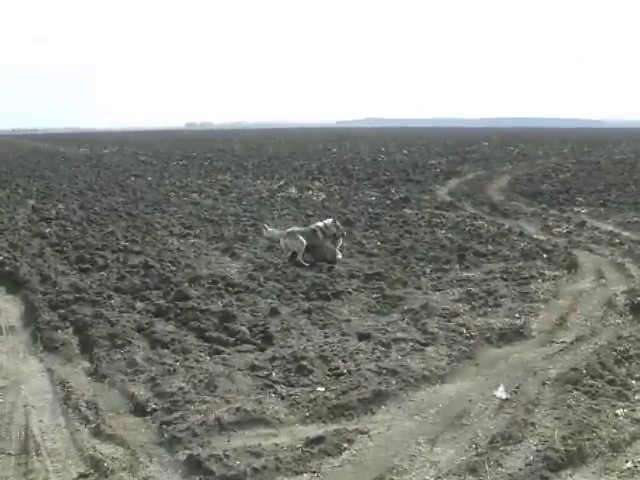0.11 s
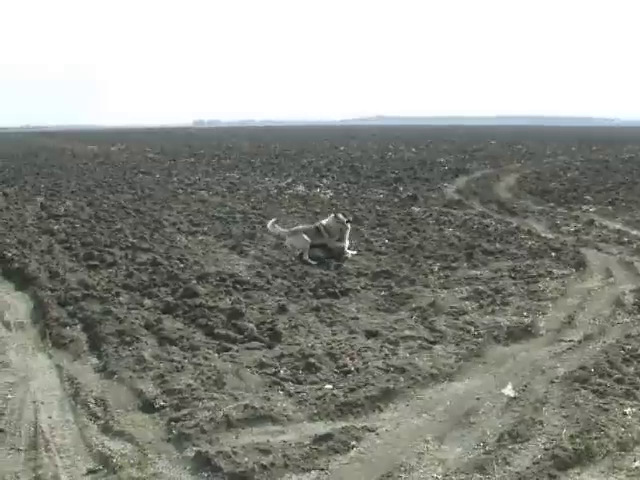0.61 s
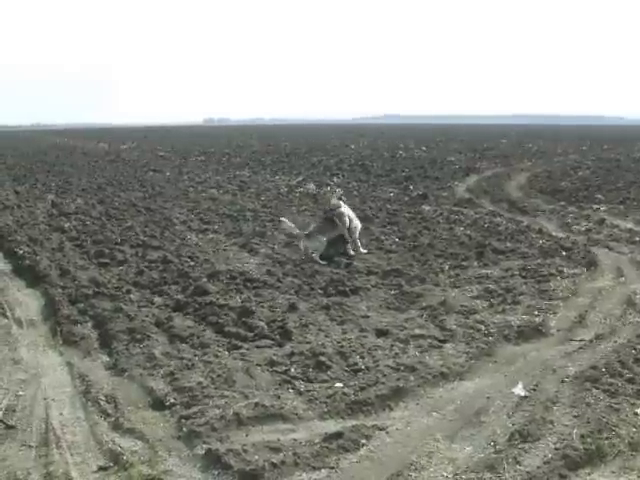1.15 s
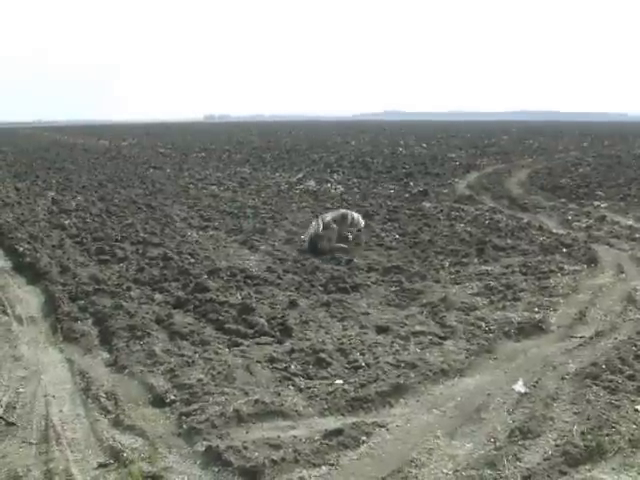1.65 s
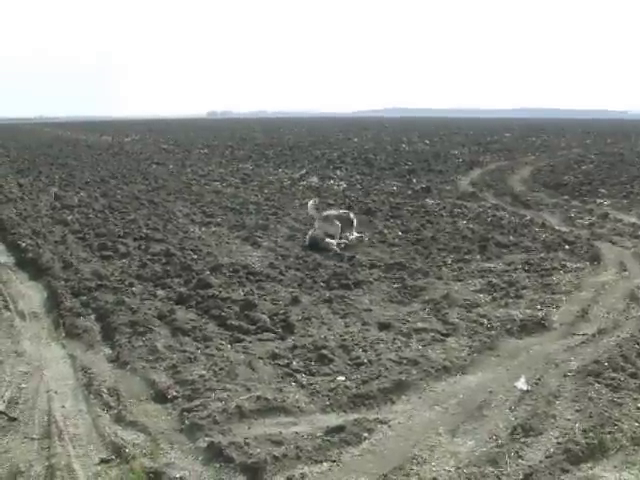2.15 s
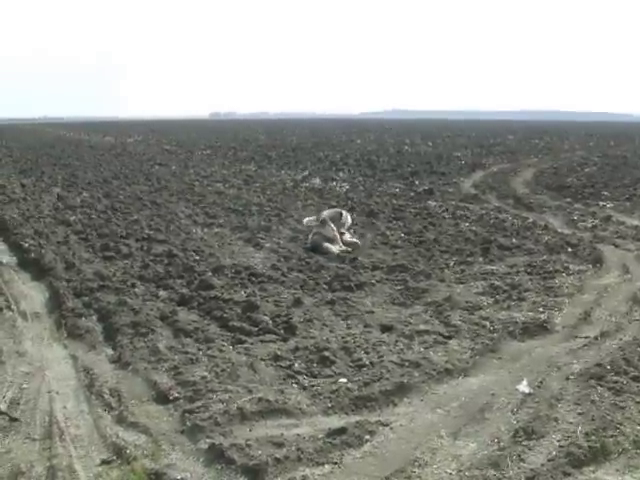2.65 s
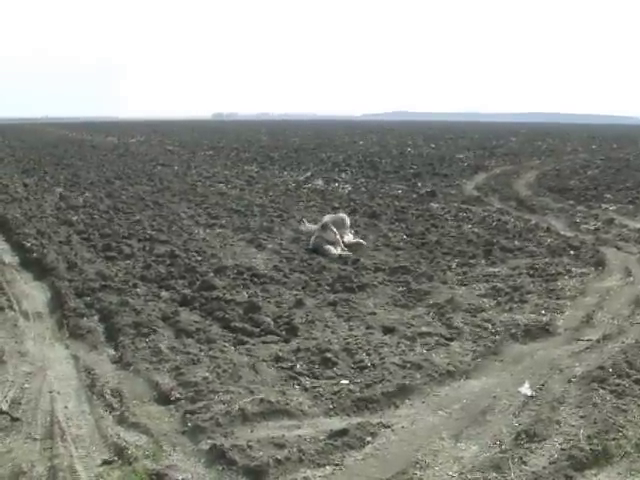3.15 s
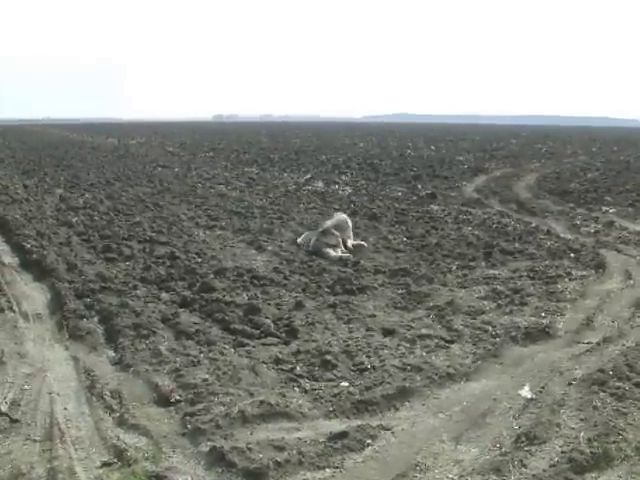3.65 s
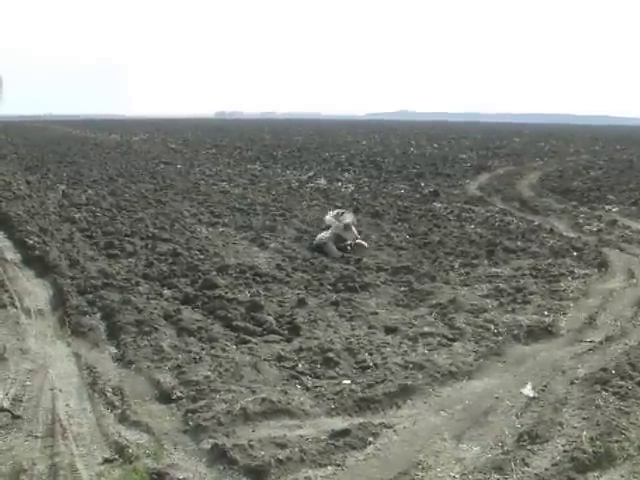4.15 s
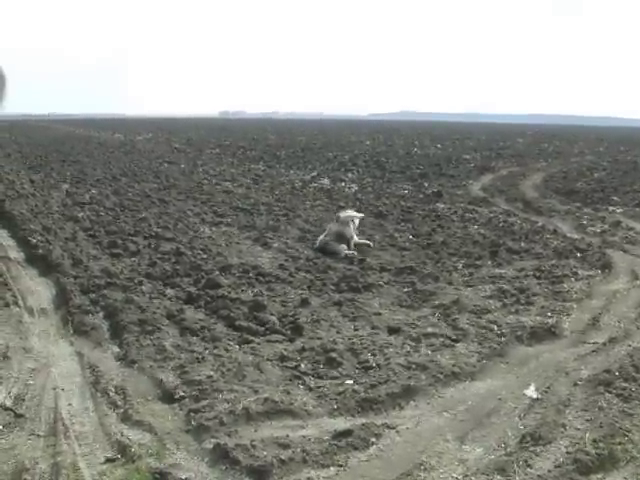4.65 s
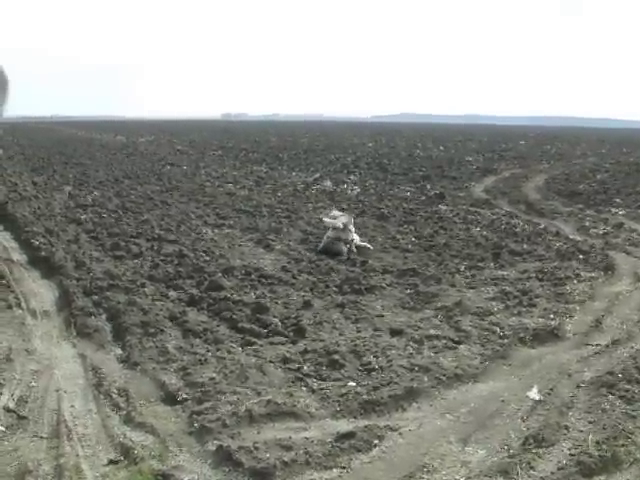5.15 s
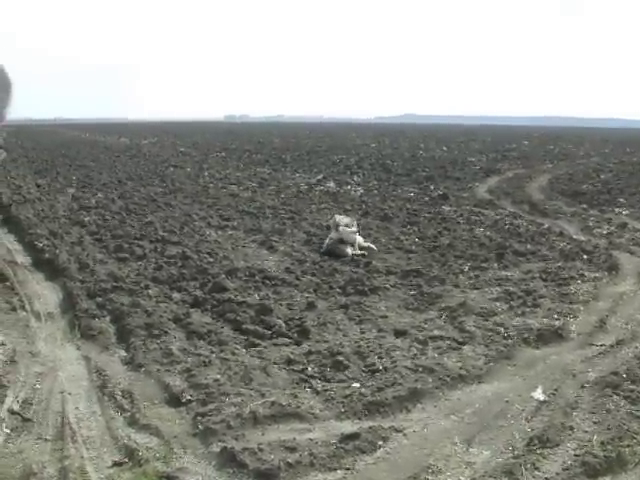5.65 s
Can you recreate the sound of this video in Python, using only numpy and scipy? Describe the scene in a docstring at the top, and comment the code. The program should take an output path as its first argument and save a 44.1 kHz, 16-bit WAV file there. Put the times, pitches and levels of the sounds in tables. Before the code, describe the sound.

Outdoor dog tussle, dry and open, caught by a cheap camera with coarse, gritty background noise. A huff and clicks, then a harsh wet snarl swells and drops, with deep fluttering growls below. A second short snarl carries one sharp tooth click; rattles thin out and a brief snarl follows. The later half is much quieter: breathy huffs, small low growls, a short snarl and a slowing throat rattle over faint hum and breeze.

```python
"""Open ploughed ground, where two dogs wrestle some way off. One snarls, huffs and rattles in its throat:
irregular fold pulses, breath and single slaps ring moving resonances. The other growls deep, with slow
pulses that are strong and weak in turn; teeth or a tag tick now and then as short bright modes.
The soil returns an early echo, and hum and breeze lie behind. A small camera samples it coarsely,
so the quiet field air flips between two converter steps."""
import sys
import numpy as np
from scipy import signal
from scipy.fft import rfft, irfft
from scipy.io import wavfile
from scipy.ndimage import uniform_filter1d

SR = 44100
rng = np.random.default_rng(int(sys.argv[2]) if len(sys.argv) > 2 else 0)


def rack_gain(trim_db):
    """Turn a fader trim in dB into the linear factor to multiply a signal by."""
    fader = np.asarray(trim_db, float)
    return 10 ** (fader / 20)


def generate_wav(sig):
    """Save sig (samples, or channels by samples) to the path in sys.argv[1] as 16-bit PCM at SR."""
    pcm = np.round(np.clip(np.atleast_2d(sig).T, -1, 1) * 32767).astype(np.int16)
    wavfile.write(sys.argv[1], SR, pcm)


N = 255339


def evened(x):
    """Normalisation: scales a signal to rms 1."""
    return x / np.sqrt(np.mean(x ** 2) + 1e-20)


def add(mix, s, sound):
    """Superposition: adds a sound to the mix from time s."""
    part = mix[round(s * SR):][:len(sound)]
    part += sound[:len(part)]


def resonate(x, hz, width_hz):
    """Moving resonance by heterodyning: shifts the curve hz down to zero, smooths, and shifts back."""
    turn = np.exp(2j * np.pi * np.cumsum(hz * np.ones(len(x))) / SR)
    r = np.exp(-np.pi * width_hz / SR)
    return 2 * (turn * signal.lfilter([1 - r], [1, -r], x / turn)).real


def pulses(hz, jitter, spread_db, alternate_db):
    """Fold vibration: one closing per cycle, uneven in time and size; returns clicks and a decaying gate."""
    wobble = evened(uniform_filter1d(rng.standard_normal(len(hz)), 300))
    turns = np.cumsum(hz * np.exp(jitter * wobble)) / SR
    cycle = turns.astype(int)
    random_db = spread_db * rng.standard_normal(len(hz))[cycle]
    size = rack_gain(random_db + alternate_db * (cycle % 2))
    clicks = -size * np.diff(cycle, prepend=0)
    gate = size * np.exp(-(turns % 1) / .3)
    return clicks, gate


def long_snarls(dogs):
    """Time-varying source and filter: effort and jaw follow a curve while the rasp slides with the lips."""
    # Effort and throat shape, one curve a snarl:
    # t/s, effort/dB, first resonance f/Hz, second resonance f/Hz, lift of second and third/dB
    curves = [
        [(0.78, -51, 1020, 2270, 0), (0.846, -29, 987, 2195, -2), (0.922, -29.5, 939, 2114, 0),
         (0.956, -21, 944, 2040, -1), (0.998, -22, 920, 2150, -7.5), (1.036, -13, 845, 2570, -0.5),
         (1.064, -25.5, 830, 1996, -1), (1.13, -31, 850, 1805, 2), (1.168, -34.5, 843, 1770, -4.5),
         (1.192, -28.5, 822, 1800, -6.5), (1.27, -50, 846, 2000, 6)],
        [(1.275, -54, 927, 2340, 3), (1.315, -35.5, 940, 2290, -1), (1.369, -33, 808, 1716, -3.5),
         (1.399, -41.5, 800, 1870, 4), (1.427, -39, 840, 1800, -3), (1.46, -63, 856, 1880, -2)],
        [(1.85, -57.5, 776, 2200, -12), (1.918, -33, 887, 2280, -10), (1.954, -34, 753, 1960, -10.5),
         (1.97, -42, 750, 1760, 11), (2.0, -41, 777, 1784, 0), (2.07, -54.5, 884, 1940, -4)],
        [(4.78, -56, 940, 2160, 3), (4.835, -46.5, 937, 2000, 1), (4.875, -46.5, 977, 2080, -6.5),
         (4.925, -44.5, 1060, 2000, -12), (4.95, -62, 1030, 2000, -10)],
    ]
    # Balance of each snarl: second/dB re first, third/dB re first, rasp/dB re first (all at usual effort),
    # rasp f/Hz at the start, rasp f/Hz at the end
    colours = [(-11, -19.5, -15.5, 4450, 5900), (-4.5, -11, -6.5, 5300, 3800), (-5, -17.5, -7, 5300, 5200),
               (-3.5, -13.5, -16, 5000, 5600)]
    # Fold drive of each snarl: pulse rate f/Hz before jitter, breath share [0-1]
    folds = [(220, .23), (220, .7), (170, .45), (180, .6)]
    for curve, colour, (rate_hz, breath) in zip(curves, colours, folds):
        s, *columns = np.transpose(curve)
        t = np.arange(s[0], s[-1], 1 / SR)
        effort_db, first_hz, second_hz, lift_db = [np.interp(t, s, column) for column in columns]
        second_db, third_db, rasp_db, start_hz, end_hz = colour
        rasp_hz = np.linspace(start_hz, end_hz, len(t))
        voice = snarl(effort_db, first_hz, second_hz, rasp_hz,
                      second_db + lift_db, third_db + lift_db, rasp_db, rate_hz, breath)
        add(dogs, s[0], voice)


def huffs(dogs):
    """Short breath bursts: one rise and fall of effort with the jaws held still."""
    # Huffs: start t/s, rise t/s, fall t/s, top effort/dB, first resonance f/Hz,
    # second/dB re first, rasp/dB re first (both at usual effort)
    huff_rows = [(0.325, 0.016, 0.078, -35.5, 1039, -13, -9), (0.46, .035, 0.027, -48, 920, -10, -14),
                 (1.499, .025, 0.19, -48, 777, -11.5, -5), (2.08, .085, .05, -44, 909, -18, -7),
                 (2.95, .1, 0.06, -56.5, 890, -6.5, -5.5), (3.66, .05, .1, -54, 997, -9.5, -11),
                 (3.919, .09, 0.055, -51.5, 958, -14, -15), (4.09, 0.074, 0.028, -53, 1012, -6.5, -15),
                 (4.999, .04, 0.15, -48, 1060, -9, -10.5)]
    # Fold drive of all huffs: pulse rate f/Hz before jitter, breath share [0-1]
    huff_folds = (130, .75)
    second_hz, rasp_hz = 2000, 5290
    third_re_second_db = -8.5
    start_db, end_db = -13, -13.5  # re top effort
    for s, rise, fall, db, first_hz, second_db, rasp_db in huff_rows:
        t = np.arange(0, rise + fall, 1 / SR)
        effort_db = db + np.interp(t, [0, rise, rise + fall], [start_db, 0, end_db])
        third_db = second_db + third_re_second_db
        voice = snarl(effort_db, first_hz, second_hz, rasp_hz, second_db, third_db, rasp_db, *huff_folds)
        add(dogs, s, voice)


def snarl(effort_db, first_hz, second_hz, rasp_hz, second_db, third_db, rasp_db, rate_hz, breath):
    """Source and filter: irregular fold pulses and puffs of breath ring a throat that moves with the jaws."""
    push_db = effort_db + 43  # re the usual effort of -43 dB
    second_lag, chest_lag, rasp_lag = .22, .3, .4  # dB that each falls behind the first per dB of push
    chest_db = -12.5  # re first, at usual effort
    clicks, gate = pulses(rate_hz + 0 * effort_db, jitter=.45, spread_db=2.8, alternate_db=0)
    puffs = (.36 + gate) * rng.standard_normal(len(gate))
    drive = (1 - breath) * evened(clicks) + breath * evened(puffs)

    first = lowest(drive, first_hz, 130)
    second = resonate(resonate(resonate(drive, second_hz, 450), second_hz, 950), second_hz, 1300)
    third = resonate(resonate(drive, 2688, 450), 2688, 900)
    chest = resonate(resonate(drive, 390, 110), 390, 250)
    rasp = bright(drive + 1.5 * evened(puffs), rasp_hz)

    # second and third have opposite polarity and share one lag
    middle = rack_gain(third_db) * evened(third) - rack_gain(second_db) * evened(second)
    voice = evened(first) + rack_gain(-second_lag * push_db) * middle
    voice += rack_gain(chest_db - chest_lag * push_db) * evened(chest)
    voice += rack_gain(rasp_db - rasp_lag * push_db) * evened(rasp)
    return rack_gain(effort_db) * voice * signal.windows.tukey(len(voice), .08)


def lowest(drive, hz, width_hz):
    """Coupled cavities: the first resonance with its nasal neighbour."""
    # Nasal side resonance: f/Hz, width of its narrower stage/Hz, gain/dB
    nose = (1220, 140, -7)
    nose_hz, nose_width_hz, nose_db = nose
    nasal = resonate(resonate(drive, nose_hz, nose_width_hz), nose_hz, 500)
    return resonate(resonate(drive, hz, width_hz), hz, 600) + rack_gain(nose_db) * nasal


def bright(drive, rasp_hz):
    """Front-cavity resonance: a moving rasp, two fixed modes and a thin flat hiss past the teeth."""
    # Fixed bright resonances: f/Hz, width of the narrower stage/Hz, gain/dB re moving rasp
    upper_modes = [(3800, 500, -4), (7600, 1000, -3)]
    rasp = resonate(resonate(drive, rasp_hz, 870), rasp_hz, 1800)
    fixed = sum(rack_gain(db) * resonate(resonate(drive, f, w), f, 2 * w) for f, w, db in upper_modes)
    flat = signal.sosfilt(signal.butter(2, 3000, "high", fs=SR, output="sos"), drive)
    return rasp + fixed + .16 * flat


def rattle_slaps():
    """Lists the impulses: single slaps, then six of a slow distant rattle that slows and fades."""
    # Slaps of the throat that stand out: t/s, peak of first resonance/dB, first resonance f/Hz,
    # upper resonances/dB re first
    rattle = [(0.335, -41, 1100, -1.5), (0.794, -31, 996, -17), (0.807, -32, 1010, -20),
              (0.819, -23.5, 1066, -6.5), (0.841, -14.5, 1064, -11.5), (0.855, -19, 930, -24),
              (0.863, -17.5, 920, -7), (0.868, -22, 854, -15), (0.883, -25, 896, -1),
              (0.903, -17, 888, -10.5), (0.93, -20.5, 975, -6.5), (0.969, -17.5, 900, -8.5),
              (1.009, -21, 720, -13), (1.026, -16, 858, -5), (1.038, -13.5, 850, -33),
              (1.111, -17, 890, -18), (1.153, -22.5, 766, -24), (1.265, -31.5, 880, -12.5),
              (1.281, -32.5, 880, -5), (1.318, -18, 1045, -10.5), (1.355, -26, 760, -1.5),
              (1.524, -26, 803, -11), (1.55, -27.5, 780, -31), (1.573, -30.5, 704, -6.5),
              (1.6, -27.5, 1120, -35), (1.641, -31, 863, -15), (1.675, -36.5, 970, -9),
              (1.706, -35.5, 955, -11), (1.896, -30.5, 790, -11), (1.924, -20, 1056, -21),
              (1.939, -25, 670, -20), (2.161, -30.5, 920, -35), (4.067, -33.5, 1010, -8.5),
              (4.152, -33.5, 1070, -10), (4.183, -33, 1004, -10), (4.832, -30.5, 990, -13.5)]
    puff_ms, far_puff_ms = 2.8, 4.2
    near = [(*row, puff_ms) for row in rattle]
    # the square term makes each gap longer
    far = [(5.024 + .0275 * k + .0023 * k * k, -33.5 - .3 * k, 1060, -17, far_puff_ms) for k in range(6)]
    return near + far


def slap(db, hz, upper_db, ms):
    """Impulse response: a click and a puff with decay constant ms ring the throat resonances."""
    t = np.arange(1800) / SR
    puff = .09 * rng.standard_normal(len(t)) * np.exp(-1000 * t / ms)
    drive = puff - (t == 0)
    first = lowest(drive, hz, 190)
    second = resonate(resonate(resonate(drive, 2280, 510), 2280, 900), 2280, 1200)
    rasp = resonate(resonate(drive, 4700, 890), 4700, 1700)
    first, second, rasp = [x / abs(x).max() for x in (first, second, rasp)]
    return rack_gain(db) * (first - rack_gain(upper_db) * (second + .33 * rasp))


def pinch(dogs, slaps):
    """Flow obstruction: the throat pinches shut for a few ms around each slap, so the voice dips."""
    t = np.arange(N) / SR
    shut = sum(np.exp(-np.maximum(s - t, 0) / .009 - np.maximum(t - s, 0) / .0039) for s, *_ in slaps)
    dogs *= 1 - .53 * np.minimum(shut, 1)


def growls(dogs):
    """Subharmonic voice: places each deep growl with its own unevenness of cycle length."""
    # Deep growls: start t/s, length t/s, mid-growl chest level/dB, mid-growl pitch f/Hz before jitter,
    # open-mouth level/dB re chest at mid-growl
    growl_rows = [(0.801, .45, -47, 86.94, 6.5), (1.5, 0.26, -56.5, 115.1, 2), (1.86, 0.2, -45, 90.2, 4.5),
                  (4.262, 0.14, -48, 92.64, 6.5), (4.409, .17, -54, 119.3, -0.5),
                  (4.62, .24, -52.5, 102.6, -1)]
    # Relative spread of the cycle length, one value a growl [rms, log units]
    unevenness = [.5, .5, .25, .09, .25, .22]
    for (s, *row), jitter in zip(growl_rows, unevenness):
        add(dogs, s, growl(*row, jitter))


def growl(length, db, middle_hz, open_db, jitter):
    """Relaxation: pressure builds through each cycle and drops sharply; pulses alternate strong and weak."""
    # Mouth resonances of the deep dog: f/Hz, width of the narrower stage/Hz, relative gain/dB
    muzzle = [(380.6, 130, 2), (670, 280, 3), (1141, 170, 7.5), (1960, 200, -3), (2380, 330, -9.5)]
    u = np.linspace(0, 1, round(length * SR))
    ends = (2 * u - 1) ** 2
    effort_db = db - 9 * ends
    mouth_db = open_db - 6.5 * ends  # the mouth is shut further at both ends
    hz = middle_hz * (1 + .05 * (.5 - u))  # the pitch sags
    clicks, gate = pulses(hz, jitter, spread_db=2, alternate_db=4)
    breath = evened((.2 + gate) * rng.standard_normal(len(hz)))
    drive = evened(clicks) + .6 * breath

    # filtered backwards in time, so each click ends a gradual build
    build = -signal.lfilter([1], [1, -.985], drive[::-1])[::-1]
    chest = signal.sosfiltfilt(signal.butter(2, [80, 420], "band", fs=SR, output="sos"), build)
    chest += .85 * resonate(chest, 155, 70)  # the ribcage booms
    mouth = sum(rack_gain(gain_db) * resonate(resonate(drive, f, w), f, 2300) for f, w, gain_db in muzzle)
    voice = evened(chest) + rack_gain(mouth_db) * evened(mouth)
    return rack_gain(effort_db) * voice * signal.windows.tukey(len(hz), .1)


def ticks(dogs):
    """Hard impacts: places the knocks of teeth or a tag."""
    # Ticks: t/s, level before rise and decay/dB, f/Hz, time to decay by 60 dB/ms
    tick_rows = [(0.333, -25.5, 5930, 8.4), (0.3572, -24, 5730, 5.1), (1.171, -24, 7870, 18),
                 (1.317, -26, 4500, 8.9), (1.3232, -5, 7220, 3.26), (1.7459, -22.5, 7720, 6.6),
                 (2.1086, -28, 7950, 7.8)]
    for s, *row in tick_rows:
        add(dogs, s, tick(*row))


def tick(db, hz, ms):
    """Modal decay: a bright mode and a crack of noise die away within ms."""
    t = np.arange(1300) / SR
    crack = .5 * np.diff(rng.standard_normal(len(t) + 1))
    rise = np.minimum(t / .0014, 1)
    return rack_gain(db - 60000 * t / ms) * (np.sin(2 * np.pi * hz * t) + crack) * rise


def side_pocket(dogs):
    """Side-branch absorption: a pocket of the throat swallows a narrow band."""
    return dogs - .8 * resonate(dogs, 1450, 220)


def ground_echo(dogs):
    """Comb interference: the bounce off the soil comes a third of a ms late and thins a broad band."""
    hz = np.fft.rfftfreq(N, 1 / SR)
    bounce = .63 * np.exp(-1j * np.pi * hz / 1450 - (hz / 2600) ** 2)  # clods scatter the treble
    return irfft(rfft(dogs) * (1 + bounce) / 1.063, N)


def read(points, hz):
    """Logarithmic frequency scale: reads a spectrum by interpolation."""
    f, value = np.transpose(points)
    return np.interp(np.log(hz + 1), np.log(f + 1), value)


def air():
    """Shaped noise: distant hum in drifting patches, and a breeze that rumbles on the microphone."""
    # Spectrum of the hum: f/Hz, relative density/dB
    spectrum = [(70, -13.5), (120, -5), (180, 1), (260, -1.5), (500, -6.5), (1200, -8), (1700, -15.5),
                (3000, -21.5), (8000, -21.5)]
    # Slow drift of the background: t/s, hum level/dB, breeze level/dB
    drift = [(0, -54, -61.5), (.8, -49.5, -66.5), (2.2, -53.5, -68.5), (2.9, -55, -66), (3.4, -52, -65),
             (3.7, -51.5, -59.5), (4.2, -52.5, -62.5), (5.0, -54, -59.5), (5.79, -53, -65.5)]
    frames, hz = N // 256 + 5, np.fft.rfftfreq(1024, 1 / SR)
    real, imaginary, patches = rng.standard_normal((frames, 513, 3)).T
    patches = evened(uniform_filter1d(uniform_filter1d(patches, 10, 0), 12, 1))
    z = (real + 1j * imaginary) * rack_gain(read(spectrum, hz)[:, None] + 1.5 * patches)
    hum = evened(signal.istft(z, nperseg=1024, noverlap=768)[1][:N])
    rumble_band = signal.butter(2, [22, 70], "band", fs=SR, output="sos")
    breeze = evened(signal.sosfilt(rumble_band, rng.standard_normal(N)))
    s, hum_db, breeze_db = np.transpose(drift)
    t = np.arange(N) / SR
    return rack_gain(np.interp(t, s, hum_db)) * hum + rack_gain(np.interp(t, s, breeze_db)) * breeze


def scene():
    """Superposition of both dogs, their echo off the soil, and the air."""
    dogs = np.zeros(N)
    long_snarls(dogs)
    huffs(dogs)
    slaps = rattle_slaps()
    pinch(dogs, slaps)
    growls(dogs)
    for s, *row in slaps:
        add(dogs, s, slap(*row))
    ticks(dogs)
    return (ground_echo(side_pocket(dogs)) + air())[None]


def scan_whine():
    """Amplitude-modulation sidebands: lines at picture-rate offsets around the camera's scan tone."""
    # Whine lines: offset from the scan tone [picture rates], level/dB rms
    whine_lines = [(-1.5, -83), (-.5, -74.5), (.5, -73.5), (1.5, -84)]
    t = np.arange(N) / SR
    scan_hz, picture_hz = 15734.26 / 2, 30000 / 1001  # half the line rate, picture rate
    whine = np.zeros(N)
    for k, db in whine_lines:
        phase = (scan_hz + k * picture_hz) * t + rng.random()
        whine += np.sqrt(2) * rack_gain(db) * np.sin(2 * np.pi * phase)
    return whine


def camera_converter(sound):
    """Quantisation: 16 kHz samples are cut down to whole steps, and a soft filter resamples them."""
    camera_sr, step = 16000, 1 / 128 / np.sqrt(2)  # Hz, amplitude
    steep = signal.firwin(128 * 441 + 1, 7980, fs=camera_sr * 441)
    sampled = signal.resample_poly(sound, 160, 441, axis=1, window=steep)
    steps = step * np.floor(sampled / step + .07)
    soft = signal.firwin(32 * 441 + 1, 8020, window=("kaiser", 8.5), fs=camera_sr * 441)
    return signal.resample_poly(steps, 441, 160, axis=1, window=soft)[:, :N]


def low_pass(x):
    """Removes everything above the highest recorded frequency."""
    return signal.sosfilt(signal.butter(12, 9050, fs=SR, output="sos"), x)


def record(dry):
    """Additive leakage, then quantisation: the scan whine joins the sound ahead of the converter."""
    mix = camera_converter(dry + scan_whine())
    return low_pass(mix)


dry = scene()
out = record(dry)
generate_wav(out)
```